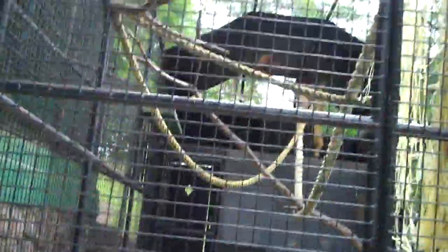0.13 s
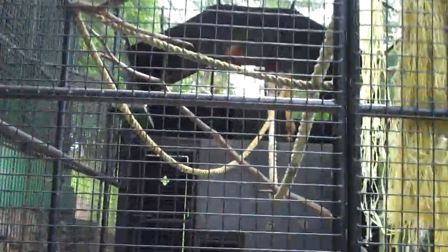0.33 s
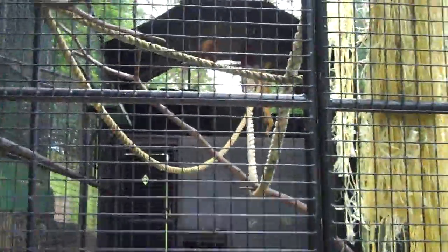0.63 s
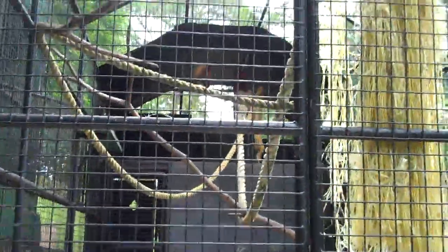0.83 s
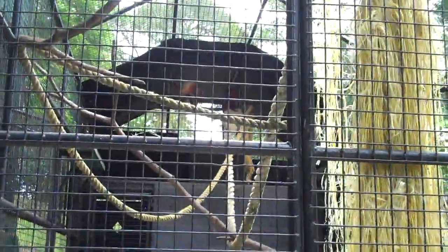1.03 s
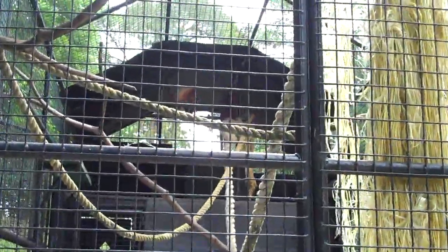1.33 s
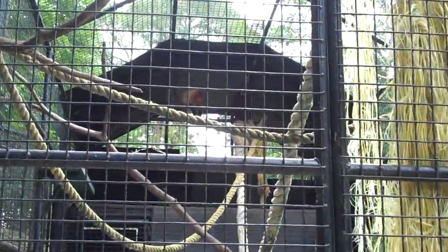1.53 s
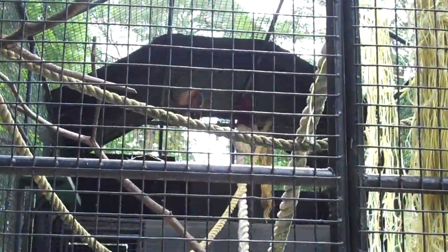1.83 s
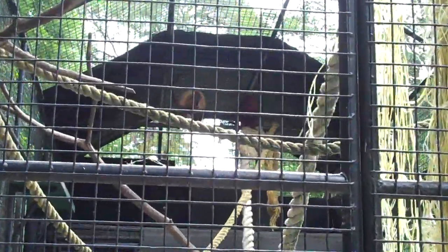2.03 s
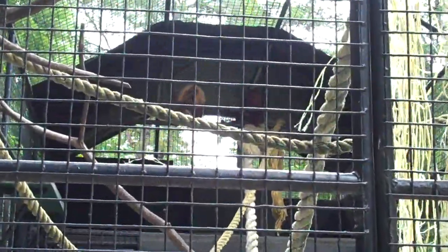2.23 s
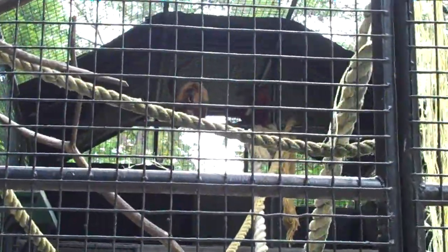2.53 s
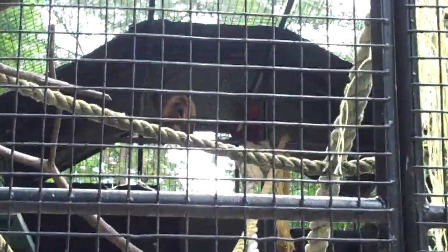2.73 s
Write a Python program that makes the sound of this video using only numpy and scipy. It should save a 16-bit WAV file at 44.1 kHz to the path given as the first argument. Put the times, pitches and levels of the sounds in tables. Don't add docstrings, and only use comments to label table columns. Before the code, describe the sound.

A howler monkey's loud, hoarse, fluttering roar runs from 0 to 0.5 seconds, then turns into a rasping, crackling in-breath that fades by 1.2. A near pause holds small throat clicks and a brief growl around 1.3. From 1.4 a new hollow roar swells, fullest from 2.5 to the end. A faint high bird chirps at 1.5. Roofed cage reverberation, soft outdoor air and faint low camera hum.

```python
import sys
import numpy as np
from scipy import signal
from scipy.fft import rfft, irfft, next_fast_len
from scipy.io import wavfile
from scipy.ndimage import uniform_filter1d

SR = 44100
rng = np.random.default_rng(int(sys.argv[2]) if len(sys.argv) > 2 else 0)


def bounce(signal):
    frames = np.transpose(np.atleast_2d(signal))
    limited = np.clip(frames, -1, 1)
    pcm = np.round(limited * 32767).astype(np.int16)
    wavfile.write(sys.argv[1], SR, pcm)


def invert_db(level):
    return 10 ** (np.asarray(level, dtype=float) / 20)


N = 127449

# start_s, mouth_shape (0-6), roughness (0-1), flutter_db
MOUTH_COURSE = [(0, 0, .75, 1.5), (.2, 0, .75, 2), (.49, .2, .75, 2), (.52, 1, .55, 2.5),
                (.74, 1.05, .55, 2), (.97, 1.75, .55, 2.5), (1.08, 2, .6, 2.5), (1.2, 2, .65, 2.5),
                (1.22, 3, .5, 3), (1.48, 3, .55, 2.5), (1.56, 4, .6, 2), (1.73, 4.1, .65, 2),
                (1.88, 5, .7, 2), (2.03, 5.1, .75, 2), (2.35, 6, .75, 2), (2.89, 6, .75, 2)]


def evened(x):
    return x / np.sqrt(np.mean(x ** 2) + 1e-20)


def read(points, hz):
    f, value = np.transpose(points)
    return np.interp(np.log(hz + 1), np.log(f + 1), value)


def along(table, column):
    return np.interp(np.arange(N) / SR, [row[0] for row in table], [row[column] for row in table])


def drift(rate_hz):
    size = next_fast_len(N)
    spectrum = rfft(rng.standard_normal(size))
    smooth = spectrum / (1 + (np.fft.rfftfreq(size, 1 / SR) / rate_hz) ** 4)
    return evened(irfft(smooth, size)[:N])


def resonate(x, hz, width, start=0):
    turn = np.exp(2j * np.pi * np.cumsum(hz * np.ones(N))[start:start + len(x)] / SR)
    r = np.exp(-np.pi * width / SR)
    return 2 * (turn * signal.lfilter([1 - r], [1, -r], x / turn)).real


def tail(t60):
    t = np.arange(SR // 2) / SR
    struck = rng.random(len(t)) < 3000 / SR
    taps = rng.standard_normal(len(t)) * struck * invert_db(-60 * t / t60) * (t > .002)
    return taps / np.linalg.norm(taps)


def air():
    # frequency_hz, level_db per Hz
    air_spectrum = [(20, -15), (45, -11), (150, -17), (550, -12), (1500, -30), (4000, -36), (7500, -29),
                    (14000, -59)]
    # frequency_hz, level_db rms
    hum_tones = [(35.5, -62.5), (42.5, -56.5), (81, -53.5)]
    t = np.arange(N) / SR
    colour = invert_db(read(air_spectrum, np.fft.rfftfreq(N, 1 / SR)))
    wash = irfft(rfft(rng.standard_normal((2, N))) * colour, N)
    hum = np.zeros(N)
    for hz, db in hum_tones:
        hum += np.sqrt(2) * invert_db(db + 0.5 * drift(3)) * np.sin(2 * np.pi * (hz * t + 0.11))
    return evened(wash) * invert_db(-43.5 + 1.3 * drift(0.77)) + [hum, 0 * hum]


def scatter(x):
    turn = 2 * np.pi * 0.618 * np.arange(N) / SR
    return sum(signal.fftconvolve(x * w, tail(0.15))[:N] for w in (np.sin(turn), np.cos(turn)))


def cage(x):
    split_hz, low_t60_s, high_t60_s = 2500, 0.4, .16
    low = signal.sosfilt(signal.butter(4, split_hz, fs=SR, output="sos"), x)
    high = signal.sosfilt(signal.butter(4, split_hz, "high", fs=SR, output="sos"), x)
    return (signal.fftconvolve(low, tail(low_t60_s)) + signal.fftconvolve(high, tail(high_t60_s)))[:N]


def bird():
    # start_s, length_s, from_hz, to_hz, level_db, fade_db per s
    chirp = (1.493, .125, 6320, 6290, -31, -95)
    start, length, from_hz, to_hz, db, fade_db = chirp
    t = np.clip(np.arange(N) / SR - start, 0, length)
    edges = np.minimum(t / .004, 1) * np.minimum((length - t) / .01, 1)
    tremolo_db = 5 * np.cos(2 * np.pi * 25 * (t - .012))
    shape = edges * invert_db(db + fade_db * t + tremolo_db)
    pitch_hz = from_hz + (to_hz - from_hz) * t / length + 40 * drift(58)
    tone = np.sin(2 * np.pi * np.cumsum(pitch_hz) / SR)
    buzz = evened(resonate(rng.standard_normal(N), 5950, 500)) * invert_db(-7 - 120 * t)
    return shape * (tone + .5 * (tone ** 2 - .5) + buzz)


def chest():
    # start_s, end_s
    breath_span = (0.536, 1.195)
    # frequency_hz, width_hz, level_db rms
    chest_modes = [(112, 48, -47.5), (218, 26, -48.5)]
    t, (start, end) = np.arange(N) / SR, breath_span
    shape = np.clip((t - start) / 0.066, 0, 1) * np.clip((end - t) / 0.047, 0, 1)
    hum = np.zeros(N)
    for hz, width, db in chest_modes:
        once = resonate(rng.standard_normal(N), hz, width)
        hum += invert_db(db) * evened(resonate(once, hz, width))
    return shape * hum


def folds():
    # start_s, level_db
    catches = [(0.5054, -14), (0.5644, -17), (0.5804, -16), (0.6134, -18), (0.6964, -16), (0.7328, -15),
               (.7747, -19), (.9413, -20), (.9797, -18), (1.0216, -18), (1.2202, -28), (1.2661, -22),
               (1.3234, -26), (1.3604, -25), (1.3938, -28), (1.4167, -25), (1.4412, -24), (1.6442, -21),
               (1.7315, -22)]
    turns = np.cumsum(122.18 * np.exp(.25 * drift(60))) / SR
    shimmer_db = 0.5 * rng.standard_normal(N)
    pulses = np.diff(np.floor(turns), prepend=0) * invert_db(shimmer_db)
    puffs = (0.52 + np.exp(-(turns % 1) / 0.21)) * rng.standard_normal(N)
    rough = along(MOUTH_COURSE, 2)
    drive = evened(np.sqrt(1 - rough) * evened(pulses) + np.sqrt(rough) * evened(puffs))

    flutter_hz = 26 * np.exp(.2 * drift(5))
    flap = np.sin(2 * np.pi * np.cumsum(flutter_hz) / SR) + .3 * drift(20)

    at, db = np.transpose(catches)
    slaps = np.zeros(N)
    slaps[np.round(at * SR).astype(int)] = invert_db(db + 21)
    slap = rng.standard_normal(200) * np.exp(-np.arange(200) / 25)
    return drive, along(MOUTH_COURSE, 3) * flap, signal.oaconvolve(slaps, slap)[:N]


def throat(drive, flap_db, slaps):
    # start_s, effort_db, rasp_db (extra for the upper resonances)
    effort = [(0, -15.5, -1.5), (.3, -15.5, 0), (.5, -14.5, 0.5), (.7, -17, 0), (.85, -19.5, 1),
              (.96, -22.5, 3.5), (1.03, -19.5, 0.5), (1.1, -25.5, -11.5), (1.2, -46, 12), (1.26, -31, -9),
              (1.267, -31, -5), (1.31, -24, -2.5), (1.39, -33, -1), (1.43, -25, -1.5), (1.7, -21.5, -3.5),
              (2.1, -18, -1), (2.5, -13.5, -1.5), (2.89, -13, -2.5)]
    # frequency_hz, width_hz, level_db
    open_mouth = [(505.6, 33.5, 4), (1005, 70, 4), (1230, 36, 1), (1888, 39, -2), (2350, 56, -3),
                  (2822, 40, -2), (3190, 250, -20), (4000, 70, -19), (4815, 65, -12.5), (5380, 50, -19),
                  (5760, 60, -18.5), (6560, 78, -16), (7640, 90, -15.5), (8065, 200, -24)]
    draw = [(462, 59, 0), (942, 27, 7.5), (1160, 170, -8.5), (1907, 64, -9), (2267, 48, -6),
            (2615, 103, -10), (3130, 900, -29.5), (3980, 120, -26), (4740, 190, -29.5), (5450, 220, -23),
            (5550, 830, -24), (6680, 630, -21), (6964, 230, -18.5), (7420, 92, -19.5)]
    drawn = [(516, 50, 4.5), (924, 43, 3), (1160, 110, -12.5), (1946, 31, -9), (2323, 120, -9),
             (2960, 91, -13), (3504, 99, -13), (4227, 110, -15), (3960, 54, -16), (4940, 130, -22),
             (5670, 100, -26.5), (6230, 160, -18), (6680, 140, -17), (7270, 120, -38)]
    pursed = [(505.4, 35, 4.5), (958, 40, 4.5), (1242, 38, -1.5), (2000, 110, -10.5), (2520, 90, -7),
              (2955, 70, -6), (3470, 110, -10), (4130, 155, -30), (4590, 71, -19), (5200, 200, -20),
              (5980, 200, -30), (6400, 130, -24), (7210, 200, -23), (6650, 90, -19)]
    narrow = [(505, 31.6, 5), (965, 56, 2), (1235, 56, -4), (1943, 66, -12.5), (2490, 24, 1.5),
              (2860, 52, -8), (3340, 85, -10.5), (3970, 34, -10), (4670, 230, -29), (5120, 86, -23),
              (5300, 60, -20), (6170, 200, -25), (7300, 110, -22), (7600, 80, -29)]
    parted = [(494, 45, 0.5), (975, 45, 4), (1237, 50, -1.5), (1930, 27, -2), (2386, 59, -4.5),
              (2813, 61, -3), (3320, 100, -18), (4100, 50, -22.5), (4740, 47, -22), (5150, 95, -17.5),
              (5740, 120, -31), (6460, 50, -20.5), (7320, 370, -23), (8350, 61, -28)]
    wide = [(502, 45.2, -2), (1000, 20, 6), (1216, 40, -2.5), (1920, 40, -9), (2330, 53, -7),
            (2840, 63, -8), (3280, 70, -17), (3700, 120, -32), (4800, 45, -12.5), (5240, 110, -24),
            (5740, 130, -26), (6640, 60, -22), (7430, 200, -29), (8100, 250, -30)]
    # frequency_hz, width_hz, level_db
    pockets = [(680, 140, -20), (880, 40, -12), (9620, 250, -19), (11250, 400, -24), (12800, 500, -26),
               (14000, 500, -27)]
    # frequency_hz, depth (0-1)
    notches = [
        [(1600, .8), (1480, .9), (1450, .92), (1600, .93), (1620, .93), (1620, .85), (1620, .85)],
        [(4400, .98), (4400, .8), (3680, .6), (3780, .7), (3780, .88), (4300, .7), (4280, .93)],
        [(9150, .9), (9150, .2), (9150, .3), (9000, .6), (9000, .6), (9100, .6), (9150, .8)],
        [(11600, .7), (12000, .5), (12000, .5), (12000, .4), (12000, .5), (12100, .8), (12100, .9)],
    ]
    notch_widths = (600, 520, 500, 600)
    steady, steady_s = .6, .045

    shapes = np.array([open_mouth, draw, drawn, pursed, narrow, parted, wide])
    modes, order = shapes.shape[1], range(len(shapes))
    place = along(MOUTH_COURSE, 1)
    effort_db = along(effort, 1)
    levels = invert_db([effort_db, effort_db + along(effort, 2)])
    sources = drive * levels * invert_db([flap_db, 2.1 * flap_db])
    wobble = 1 + .003 * drift(17)
    size = round(steady_s * SR)
    out = np.zeros(N)
    for k in range(modes):
        hz = np.interp(place, order, shapes[:, k, 0]) * np.roll(wobble, k * N // modes)
        upper = int(k >= modes // 2)
        source = sources[upper] + slaps * (k > 2)
        ring, usual = np.zeros((2, N))
        for s, (_, width, db) in enumerate(shapes[:, k]):
            share = np.clip(1 - abs(place - s), 0, 1)
            a, b = np.flatnonzero(share)[[0, -1]] + [0, 3000]
            ring[a:b] += invert_db(db) * resonate((source * share)[a:b], hz, width, a)
            usual += share * invert_db(db) * np.sqrt(np.pi * width / SR) * levels[upper]
        power = abs(uniform_filter1d(ring ** 2, size)) + 1e-14
        ratio = uniform_filter1d(usual ** 2, size) / power
        out += (-1) ** k * ring * np.minimum(ratio, 10) ** (steady / 2)
    for hz, width, db in pockets:
        out += invert_db(db) * resonate(sources[int(hz > 3500)], hz, width)
    for notch, width in zip(np.array(notches), notch_widths):
        depth = np.clip(np.interp(place, order, notch[:, 1]), 0, 1)
        out = out - depth * resonate(out, np.interp(place, order, notch[:, 0]), width)
    return invert_db(21) * out


def scene():
    # frequency_hz, share (0-1)
    shared = [(60, 1), (600, 0.99), (1300, 0.97), (2900, 0.88), (6200, 0.73), (9000, 0.14), (13500, 0.083)]
    # frequency_hz, left_over_right_db
    lean = [(30, -12), (60, -4.5), (200, -2), (2200, -0.5), (7400, -3.5), (8300, 13), (9200, 4.5),
            (13500, 13.5)]
    # frequency_hz, level_db
    ports = [(60, -26), (250, -3.5), (450, -3), (3000, -6.5), (8400, -6), (9300, -29), (11000, -30),
             (14200, -41)]
    voice = throat(*folds()) + bird()
    near = voice + invert_db(-3.5) * cage(voice)
    common, apart = air()
    own = [scatter(near) for port in range(2)]

    hz = np.fft.rfftfreq(N, 1 / SR)
    same = np.clip(read(shared, hz), 0, 1)
    colour = invert_db(read(ports, hz))
    alike = rfft(near) * colour + rfft(common + chest())
    different = rfft(own) * colour + rfft([apart, -common])
    z = same * alike + np.sqrt(1 - same ** 2) * different
    return irfft(z * invert_db(read(lean, hz) * np.array([[.5], [-.5]])), N)


def roll_off(x):
    return signal.sosfilt(signal.butter(12, 14255, fs=SR, output="sos"), x)


def record(dry):
    gate_hz, gate_db, spread_db, tilt_db = 3500, -57.5, 2., -6
    hz, _, z = signal.stft(dry, SR, nperseg=2048)
    z = z[:, :1024]
    power = abs(z) ** 2
    bands = power.reshape(2, 128, 8, -1).mean(2)
    octaves = np.log2(np.maximum(hz[4:1024:8, None], gate_hz) / gate_hz)
    limit_db = gate_db + tilt_db * octaves + spread_db * rng.standard_normal(bands.shape)
    limit = power.sum((0, 1)) * invert_db(limit_db) ** 2
    keep = np.repeat(bands > limit, 8, axis=1)
    z = z * np.where(hz[:1024, None] > gate_hz, keep, 1)
    gated = signal.istft(np.pad(z, ((0, 0), (0, 1), (0, 0))), SR, nperseg=2048)[1][:, :N]
    return roll_off(gated)


dry = scene()
out = record(dry)
bounce(out)
```